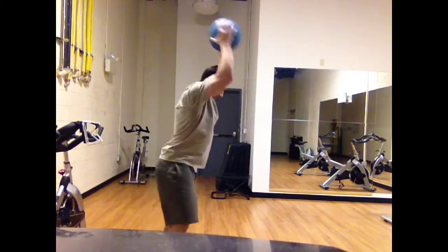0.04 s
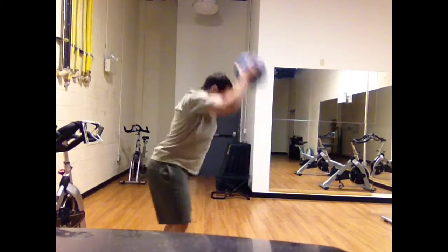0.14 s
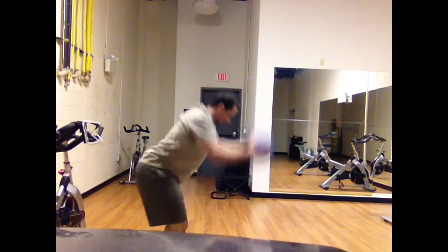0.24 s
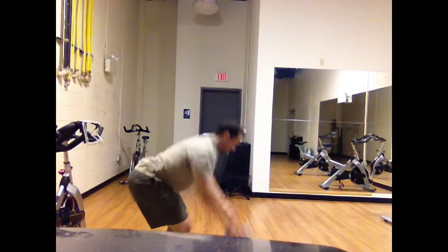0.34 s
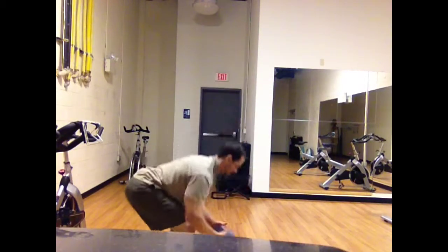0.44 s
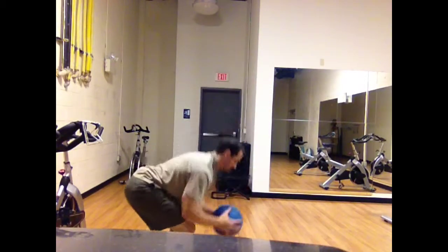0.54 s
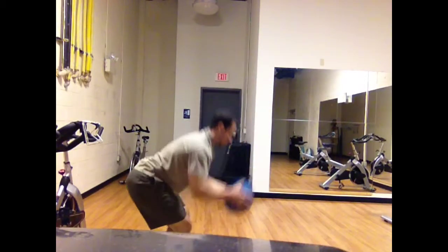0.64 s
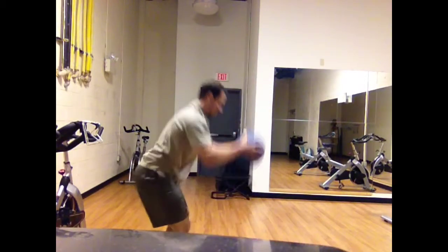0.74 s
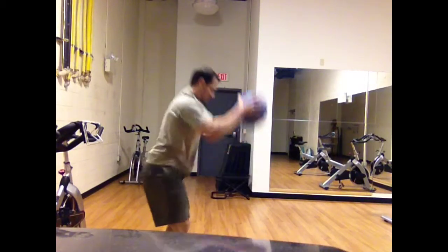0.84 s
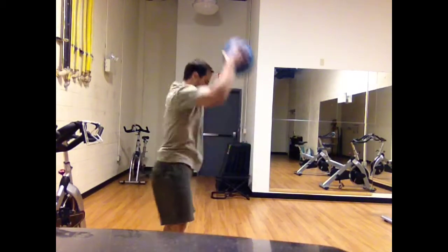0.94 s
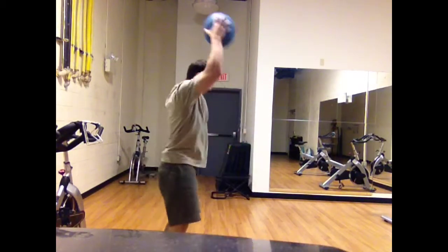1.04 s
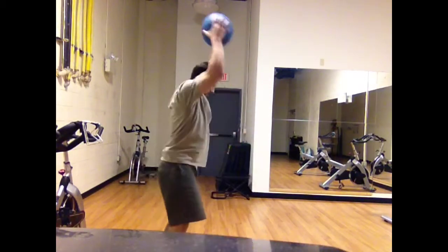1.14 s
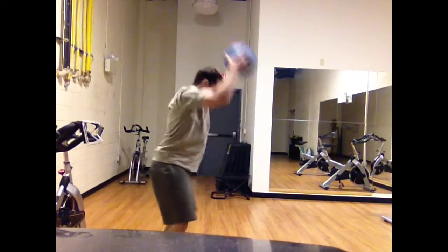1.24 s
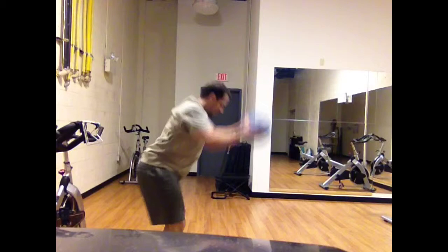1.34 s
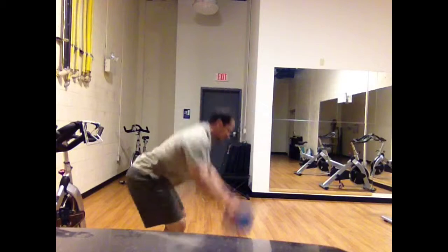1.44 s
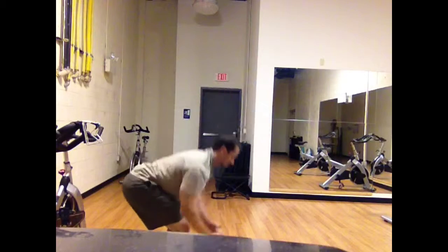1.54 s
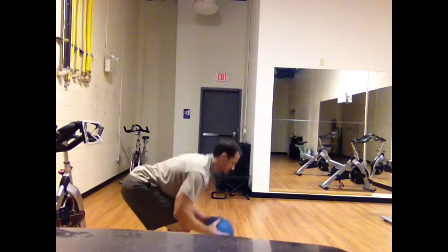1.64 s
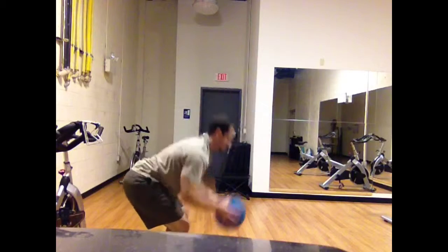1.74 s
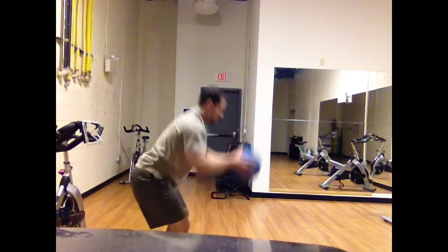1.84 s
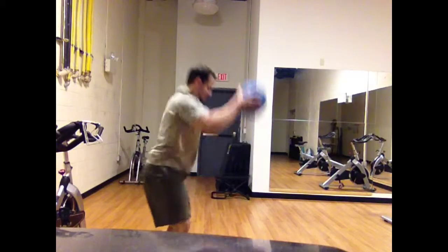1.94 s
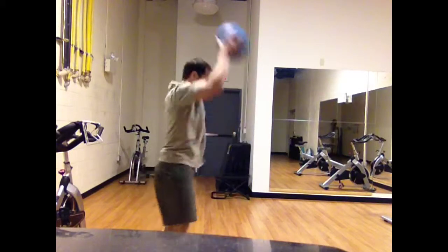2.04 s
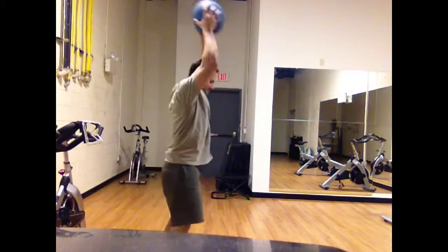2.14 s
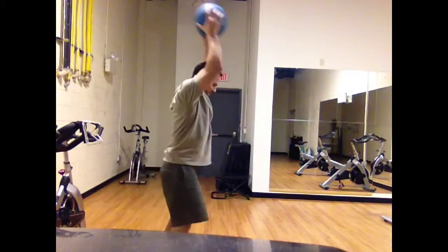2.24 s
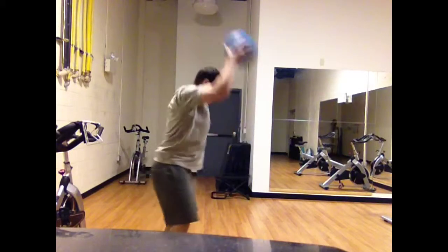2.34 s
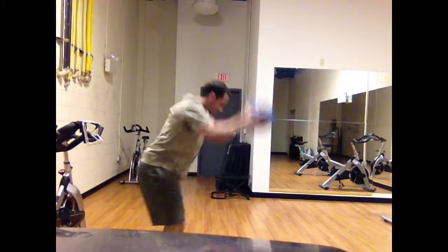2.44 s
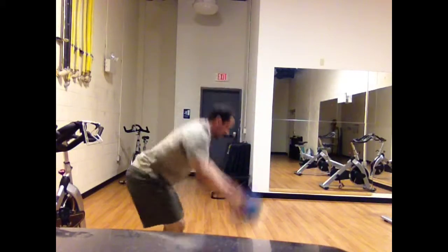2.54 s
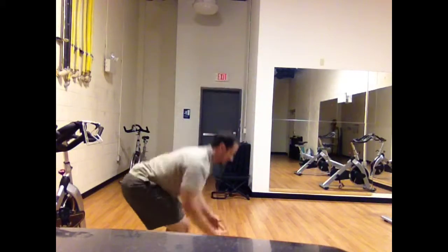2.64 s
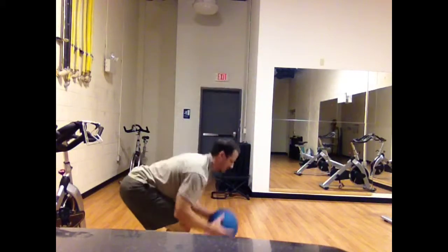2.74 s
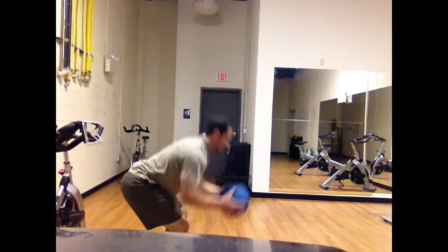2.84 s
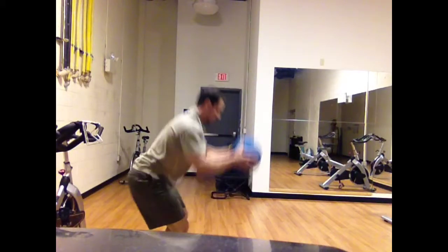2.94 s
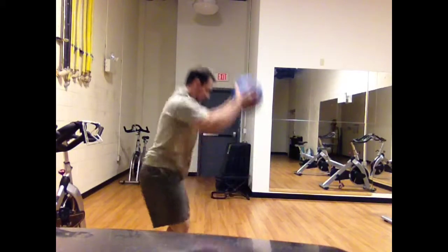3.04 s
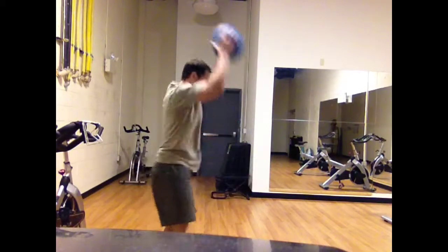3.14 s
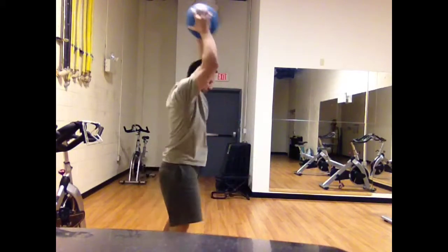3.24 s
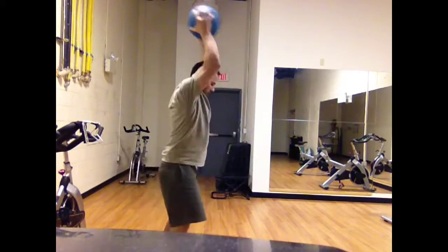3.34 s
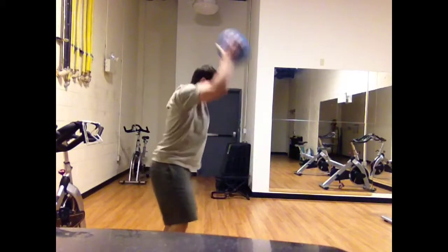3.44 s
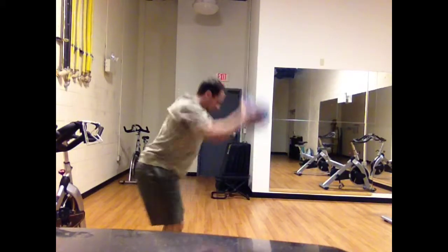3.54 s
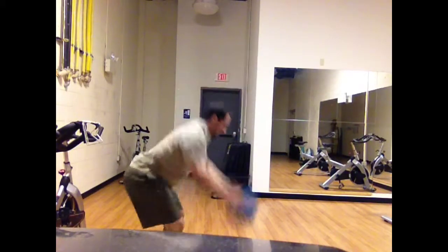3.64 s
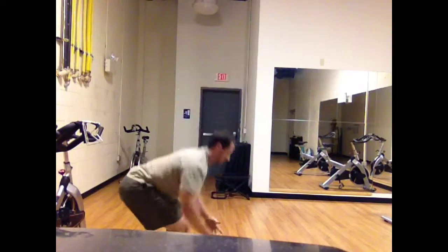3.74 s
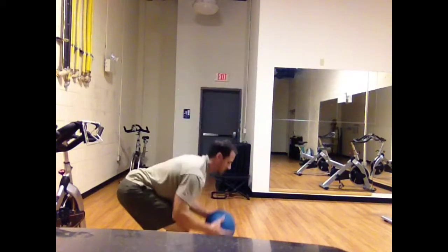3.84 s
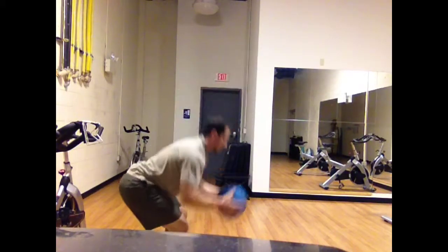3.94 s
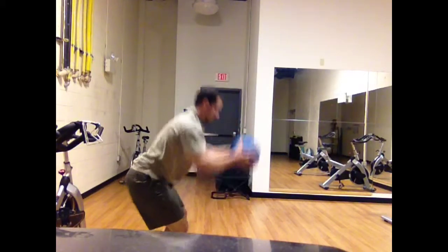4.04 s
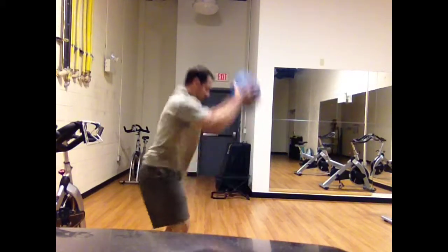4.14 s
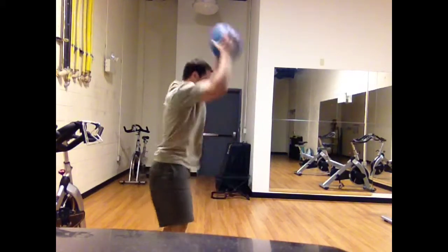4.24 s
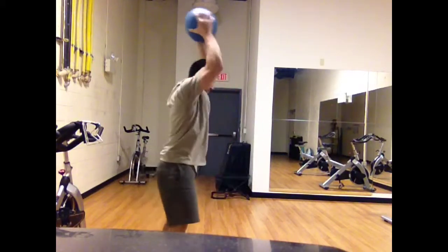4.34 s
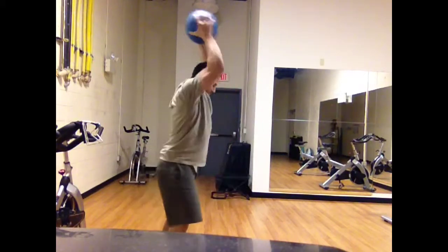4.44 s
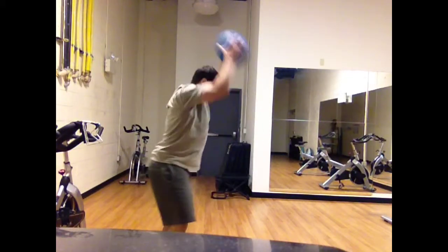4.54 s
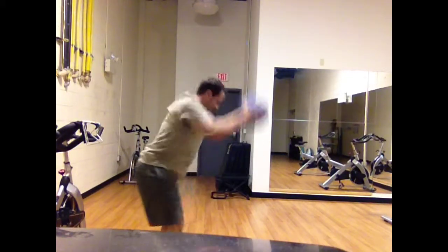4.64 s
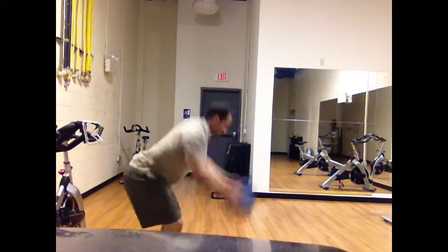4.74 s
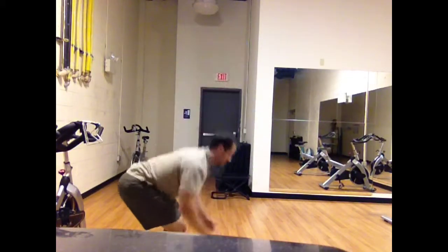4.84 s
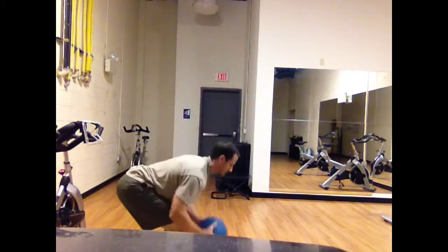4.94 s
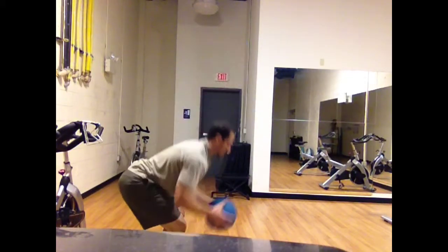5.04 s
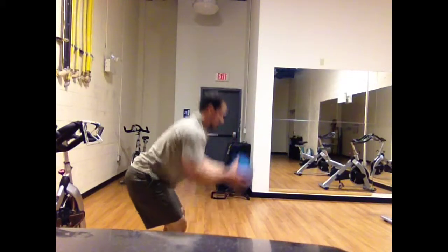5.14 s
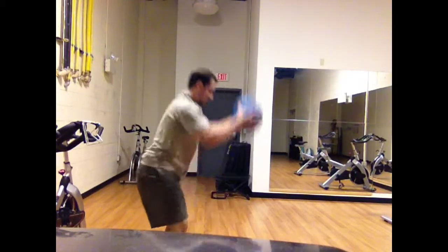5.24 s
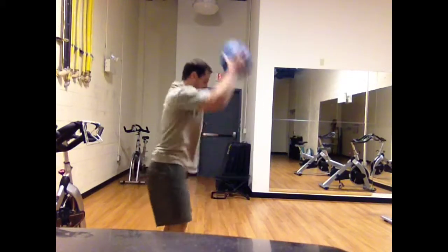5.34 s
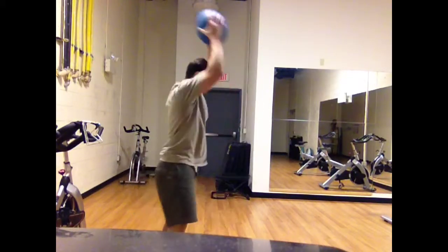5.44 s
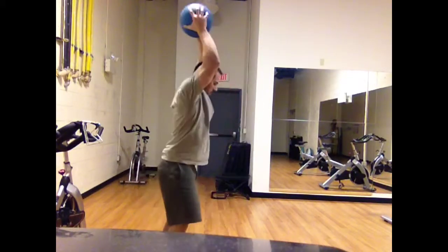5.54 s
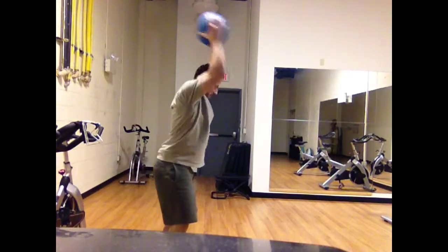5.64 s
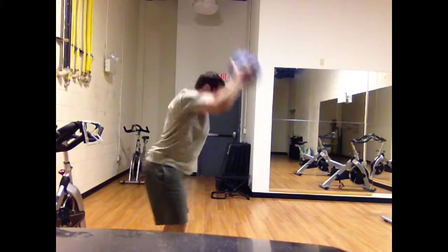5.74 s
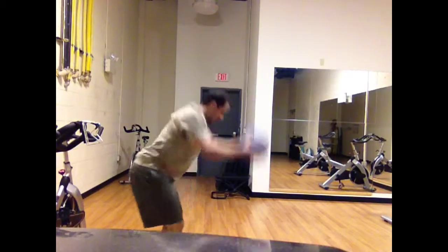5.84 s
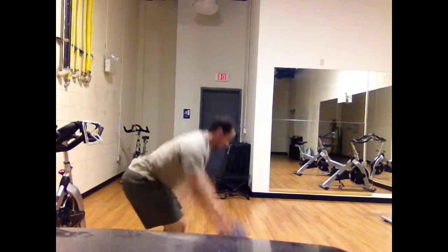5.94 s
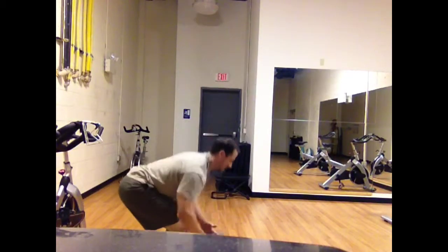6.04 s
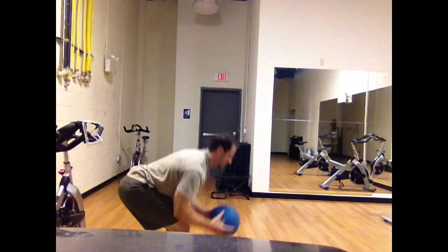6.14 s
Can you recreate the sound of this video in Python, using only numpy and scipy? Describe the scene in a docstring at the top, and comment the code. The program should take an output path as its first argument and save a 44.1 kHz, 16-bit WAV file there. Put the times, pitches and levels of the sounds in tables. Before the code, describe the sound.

It opens on the fading ring of a large, hard-walled gym, over a quiet, steady rush and hum of ventilation. Close to the microphone, a rubber medicine ball is slammed onto the wooden floor at about 0.4, 1.5, 2.6, 3.7, 4.8 and 6.0 seconds, all about equally loud. Each slam is a sharp slap, fused with a tiny high chirp of squeezed air and a slight hollow ping from the ball. The hall rings for up to two seconds after each, growing duller as it fades and running into the next hit. The slam at 2.6 seconds also has a short, dry low thump. A very faint swish of cloth comes just before every slam. Palms take hold of the ball with soft double taps at the very start and around 1.1, 2.1, 3.3 and 4.2 seconds. The last slam lands right at the end.

```python
"""First comes the fading ring of a big, hard-walled gym, over the hum of its ventilation.
Then, close to the microphone, a rubber medicine ball is slammed on the wooden floor about once a second.
Each slam is a chirp of squeezed-out air and a sharp slap, followed by the long ring of the hall.
There is a short, dry low thump on the landing, strong on one slam.
Hands tap the ball faintly between slams, and cloth rustles on each downswing."""
import sys
import numpy as np
from scipy import signal
from scipy.fft import rfft, irfft
from scipy.io import wavfile
from scipy.ndimage import uniform_filter1d, minimum_filter1d

SR = 44100
rng = np.random.default_rng(int(sys.argv[2]) if len(sys.argv) > 2 else 0)


def log_audio(samples):
    """Write samples as a 16-bit WAV file to the path given in sys.argv[1]."""
    # one column per channel
    frames = np.atleast_2d(samples).T
    # limit to full scale, then quantise
    limited = np.clip(frames, -1, 1)
    pcm = np.round(limited * 32767).astype(np.int16)
    wavfile.write(sys.argv[1], SR, pcm)


N = 272979
LEAD = SR  # samples ahead of the opening, so the hall is already ringing

# The ball's landings; only the ring of the first is heard. Each row: time in seconds, strength in dB,
# relative chirp level in dB, the chirp's starting pitch in Hz, relative low thump level in dB.
SLAMS = [(-0.72, -0.5, -12, 8000, -45), (0.3844, -0.4, -3.5, 7200, -42), (1.4804, 0, -6, 10500, -44),
         (2.5925, -0.1, -1.5, 8200, -21), (3.6931, 0.7, -5.5, 10500, -44), (4.8070, -0.9, -7, 8000, -42),
         (5.9641, 0.1, -6.5, 10000, -44)]


def amp(db):
    """Decibels to gain."""
    return 10 ** (np.asarray(db) / 20)


def curve_at(points, hz):
    """A table's value at hz, on straight lines over log frequency."""
    point_hz, value = np.transpose(points)
    return np.interp(np.log(hz + 1), np.log(point_hz), value)


def add(mix, start_s, sound):
    """Mixes a sound in, start_s after the opening."""
    part = mix[LEAD + round(start_s * SR):][:len(sound)]
    part += sound[:len(part)]


def pulse(spectrum, size=4096):
    """An impact: the most compact causal pulse that has this spectrum."""
    hz = abs(np.fft.fftfreq(size, 1 / SR))
    log_gain = np.log(amp(curve_at(spectrum, hz)))
    return np.fft.ifft(np.exp(np.conj(signal.hilbert(log_gain)))).real


def ventilation(rush_db=-59.5, waver_rad=.3):
    """The gym's room tone: a steady rush of air with a few wavering fan tones."""
    # The rush of air. Each row: frequency in Hz, relative spectral density in dB.
    rush_spectrum = [(25, -30), (55, -27), (85, -14), (130, -3), (230, 0), (310, -8), (600, -9),
                     (1200, -12), (2500, -23), (4500, -29), (7000, -31.5), (9400, -34.5), (10300, -40.5),
                     (15000, -40.5)]
    # The fan tones. Each row: frequency in Hz, rms level in dB.
    fan_tones = [(120, -73), (177.6, -70), (360.7, -69), (5642, -88), (5760, -87), (6842, -88)]
    t = np.arange(N) / SR
    colour = amp(curve_at(rush_spectrum, np.fft.rfftfreq(N, 1 / SR)))
    rush = irfft(rfft(rng.standard_normal(N)) * colour, N)
    out = amp(rush_db) * rush / rush.std()
    for hz, db in fan_tones:
        drift = np.interp(t, np.linspace(0, t[-1], 40), np.cumsum(rng.standard_normal(40)))
        out += amp(db) * np.sqrt(2) * np.sin(2 * np.pi * hz * t + waver_rad * drift)
    return out


def scatter(size=2 * SR):
    """The many paths through the hall to the microphone: sparse taps of random sign."""
    return rng.choice([-1, 1], size) * (rng.random(size) < 1 / 10) * np.sqrt(10)


def shifted(paths, alike_hz=1900):
    """The ball lands a little to one side: long waves keep their paths, short waves find new ones."""
    change = np.fft.rfftfreq(len(paths), 1 / SR) / alike_hz
    return irfft((rfft(paths) + change * rfft(scatter())) / np.hypot(1, change))


def hall(paths, room_db, tail_db=-21.1, build_s=.1, early_share=.56, near_rise_s=.001, near_decay_s=.012,
         bounce_s=.00275, bounce_db=-4):
    """From landing spot to microphone: direct sound, first echoes, a tail that thickens and darkens."""
    # Echoes off the nearest wall, the ceiling and the mirror wall.
    # Each row: delay in seconds, level in dB before room_db and absorption.
    echoes = [(.0165, -5), (.0268, -8), (.0284, -8)]
    # The hall's reverberation. Each row: frequency in Hz, seconds to fall by 60 dB.
    ring_times = [(60, 1.2), (130, 1.2), (280, 1.33), (500, 1.83), (900, 2.15), (1400, 2.2), (2500, 1.64),
                  (4500, 1.07), (6200, .76), (10000, .54), (15000, .41)]
    t = np.arange(len(paths)) / SR
    # close scatter dies away until the first wall answers; then the room fills
    near = (1 - np.exp(-t / near_rise_s)) * np.exp(-t / near_decay_s)
    filling = 1 - (1 - early_share) * np.exp(-t / build_s)
    taps = amp(tail_db) * paths * np.where(t < echoes[0][0], near, filling)
    for delay_s, db in echoes:
        taps[round(delay_s * SR)] += amp(db)
    # air and walls swallow the treble first, the sprung floor takes the bass
    hz, age_s, spectra = signal.stft(taps, SR, nperseg=512)
    absorbed_db = 60 * age_s / curve_at(ring_times, hz)[:, None]
    response = signal.istft(spectra * amp(room_db - absorbed_db), SR)[1]
    # the direct sound and one close bounce come through dulled, losing their top
    bent = np.array([1, 2, 1]) / 4
    response[:len(bent)] += bent
    response[round(bounce_s * SR):][:len(bent)] += amp(bounce_db) * bent
    return response


def shirt_swishes(level_db=-71, low_cut_hz=3000, ahead_s=.05, width_s=.045):
    """Cloth slides as the arms come down: a faint, dry hiss that peaks just before each slam."""
    t = np.arange(N) / SR
    swing = sum(amp(db) * np.exp(-.5 * ((t - land_s + ahead_s) / width_s) ** 2)
                for land_s, db, *_ in SLAMS)
    low_cut = signal.butter(1, low_cut_hz, "high", fs=SR, output="sos")
    hiss = signal.sosfilt(low_cut, rng.standard_normal(N))
    return amp(level_db) * swing * hiss / hiss.std()


def grips(second_hand_s=.025, second_hand_db=-1, patter_s=.003, patter_gain=.12, size=600):
    """Two palms land on the rubber, one after the other, and the fingers patter after each."""
    # The hands take hold of the ball. Each row: start in seconds, strength in dB.
    holds = [(0.038, -36), (1.052, -36), (2.052, -38), (3.288, -44), (4.238, -44)]
    # Skin on rubber. Each row: frequency in Hz, relative level in dB.
    palm_spectrum = [(100, -15), (1000, 4), (3000, 3), (6000, 2), (9000, -5), (15000, -13)]
    out = np.zeros(LEAD + N)
    fade = np.exp(-np.arange(size) / SR / patter_s)
    for start_s, db in holds:
        for lag_s, hand_db in ((0, 0), (second_hand_s, second_hand_db)):
            touch = patter_gain * rng.standard_normal(size) * fade
            add(out, start_s + lag_s, amp(db + hand_db) * signal.fftconvolve(touch, pulse(palm_spectrum)))
    return out


def air_chirp(start_hz, end_hz=4200, swell_s=.0011, hiss=.1, size=64):
    """Air escapes from the closing gap: a whistle that swells and drops in pitch as the ball lands."""
    to_landing_s = np.arange(size, 0, -1) / SR
    swell = signal.windows.tukey(size, .3) * np.exp(-to_landing_s / swell_s)
    whistle = np.sin(2 * np.pi * np.cumsum(np.geomspace(start_hz, end_hz, size)) / SR)
    return swell * (whistle + hiss * rng.standard_normal(size))


def slams(paths, thump_hz=195, thump_s=.0018, slap_room_db=-2, chirp_room_db=-14.5):
    """Each landing: air chirp, the ball's slap and ping, and a short, dry low thump, strong on one slam."""
    # Rubber on wood. Each row: frequency in Hz, relative level in dB.
    slap_spectrum = [(30, -12), (70, -14), (120, 6.5), (165, 3.5), (240, 9.3), (315, 1.5), (390, 9.8),
                     (520, 9.8), (800, 17.8), (1300, 19.2), (2050, 11.1), (3300, 10.6), (4700, 13.8),
                     (6000, 5.2), (8500, 1.3), (11500, -6), (15500, -13)]
    # The air ringing inside the ball. Each row: pitch in Hz, relative level in dB, seconds to fall 60 dB.
    ball_modes = [(860, -44, .16), (1115, -40, .16), (1335, -39, .16), (1626, -43, .14), (2411, -49, .12),
                  (3350, -47, .12), (4180, -43, .1), (4695, -43, .1)]
    out = np.zeros(LEAD + N)
    t = np.arange(SR // 5) / SR
    thump = np.sin(2 * np.pi * thump_hz * t) * t / thump_s * np.exp(1 - t / thump_s)
    ping = sum(amp(db - 60 * t / t60) * np.sin(2 * np.pi * hz * t) for hz, db, t60 in ball_modes)
    smack = ping - pulse(slap_spectrum, size=len(t))
    for land_s, db, chirp_db, chirp_hz, thump_db in SLAMS:
        chirp = amp(db + chirp_db) * air_chirp(chirp_hz)
        # the air spurts out in a new direction each time, so it takes paths of its own
        chirp_room = hall(scatter(size=SR), chirp_room_db)
        add(out, land_s - len(chirp) / SR, signal.oaconvolve(chirp, chirp_room))
        slap_room = hall(shifted(paths), slap_room_db)
        add(out, land_s, amp(db) * signal.fftconvolve(smack, slap_room))
        add(out, land_s, amp(db + thump_db) * thump)
    return out


def scene():
    """At one microphone: slams and grips ring in the same hall, over ventilation and rustling cloth."""
    paths = scatter()
    ball = slams(paths)
    hands = signal.oaconvolve(grips(), hall(paths, room_db=-8))[:LEAD + N]
    return ((ball + hands)[LEAD:] + ventilation() + shirt_swishes())[None]


def record(dry, ceiling_db=-2.8, recovery_db_per_s=200, low_cut_hz=45, high_cut_hz=15450):
    """A fast limiter catches each slap and ducks the first echoes; then the microphone's band limits."""
    over_db = np.maximum(20 * np.log10(abs(dry[0]) + 1e-9) - ceiling_db, 0)
    recovery_db = recovery_db_per_s * np.arange(N) / SR
    gain_db = recovery_db - np.maximum.accumulate(over_db + recovery_db)
    gain_db = uniform_filter1d(minimum_filter1d(gain_db, size=11), size=11)  # eases in ahead of the peak
    limited = dry * amp(gain_db)
    low_cut = signal.butter(2, low_cut_hz, "high", fs=SR, output="sos")
    high_cut = signal.firwin(401, high_cut_hz, window=("kaiser", 9), fs=SR)
    return signal.oaconvolve(signal.sosfilt(low_cut, limited), high_cut[None], "same")


dry = scene()
out = record(dry)
log_audio(out)
```